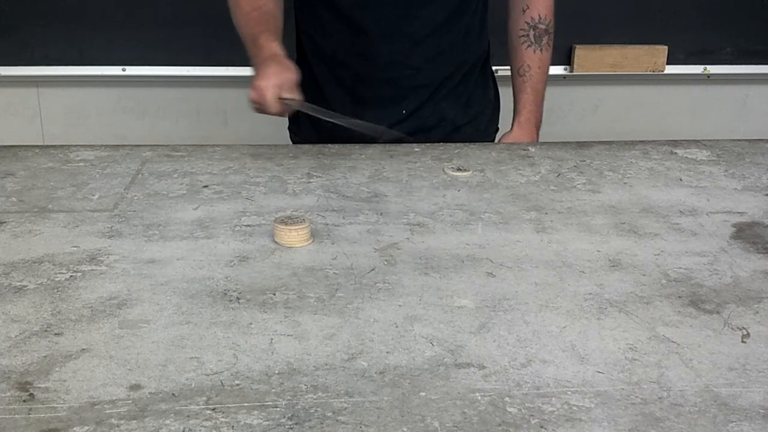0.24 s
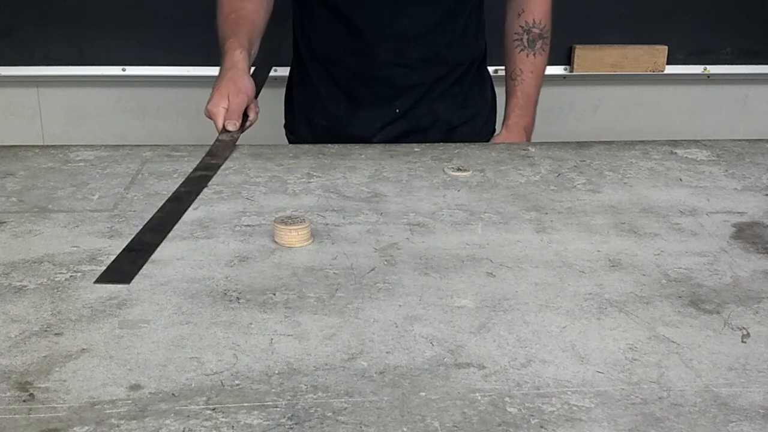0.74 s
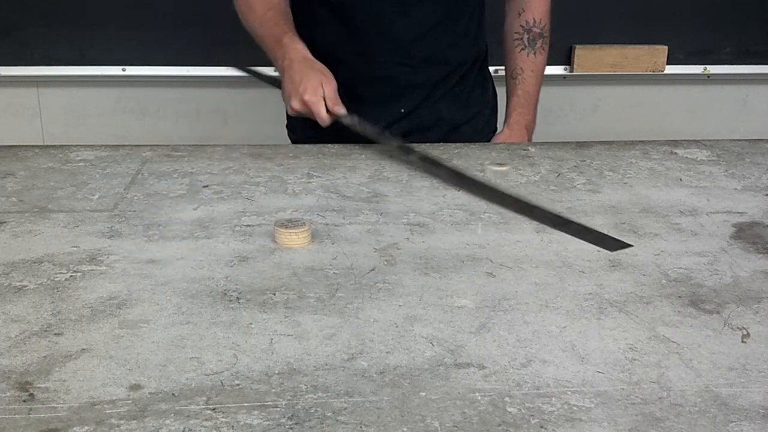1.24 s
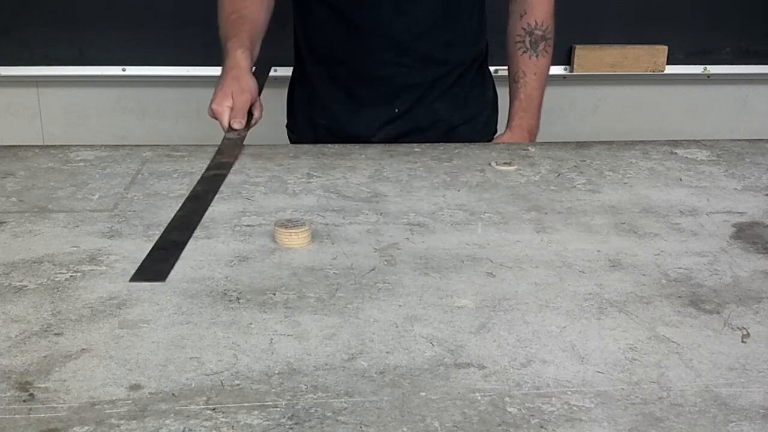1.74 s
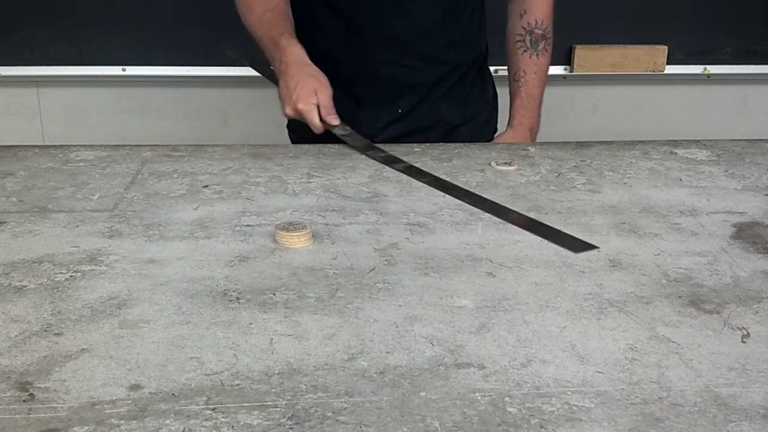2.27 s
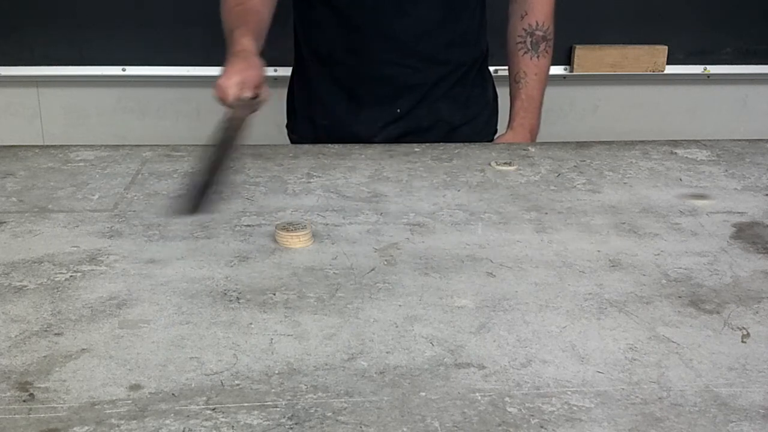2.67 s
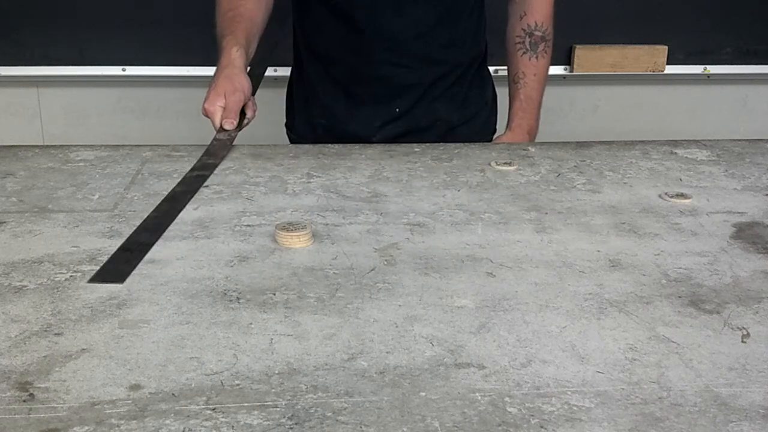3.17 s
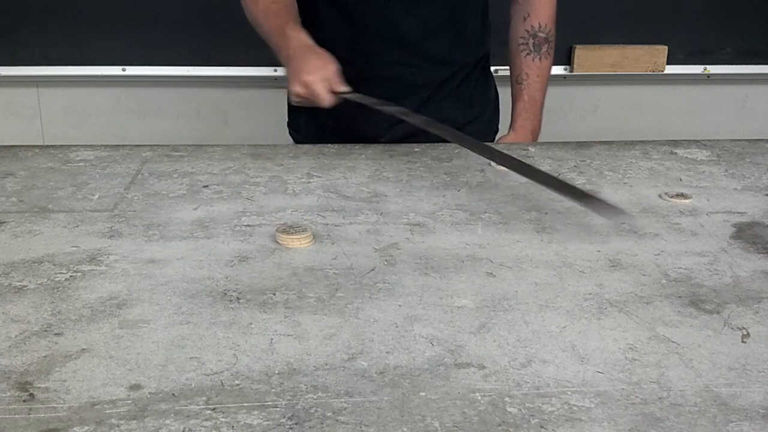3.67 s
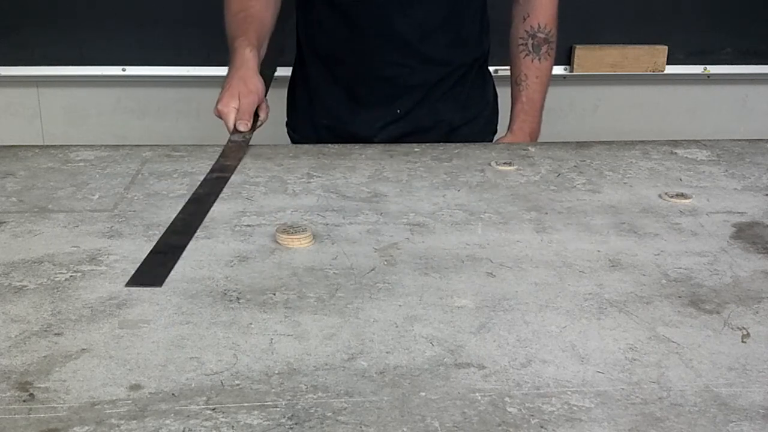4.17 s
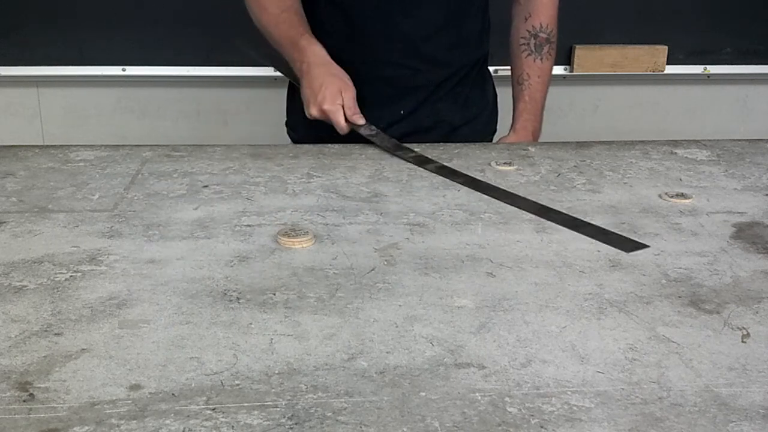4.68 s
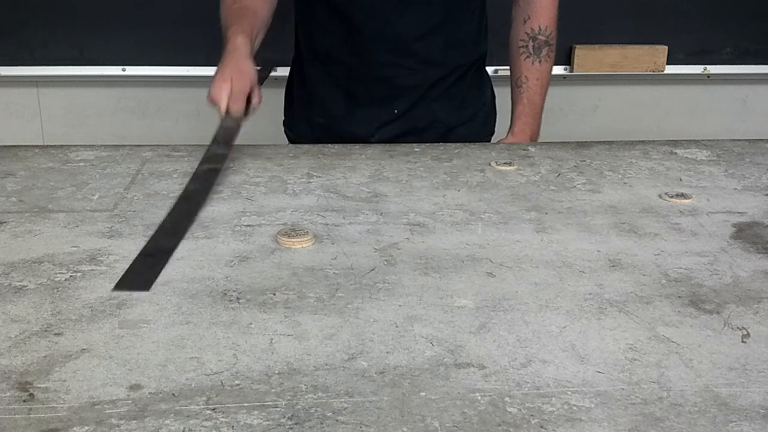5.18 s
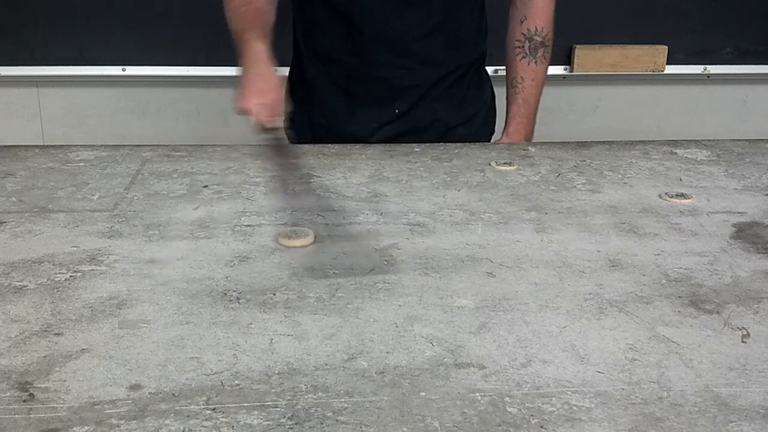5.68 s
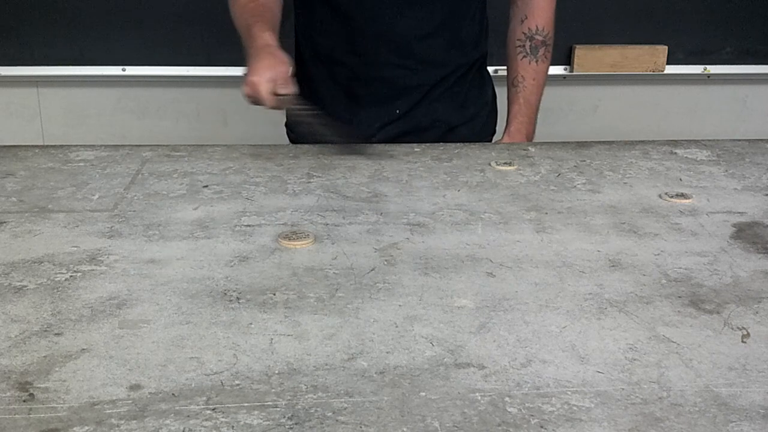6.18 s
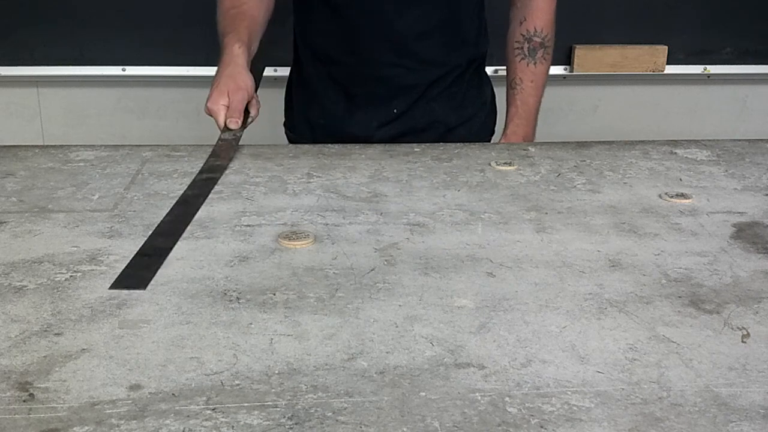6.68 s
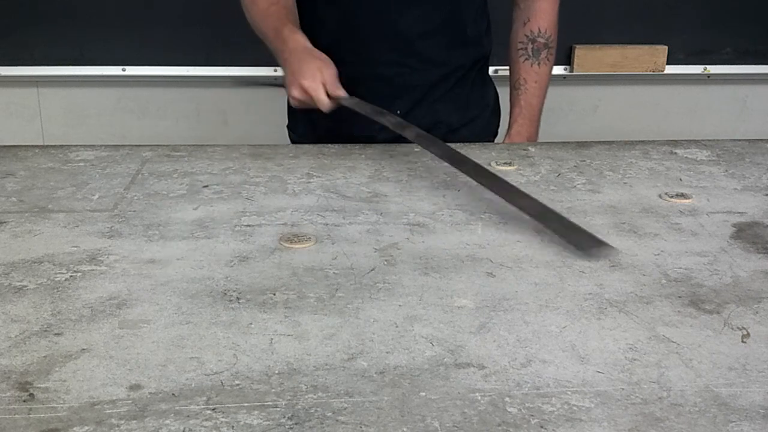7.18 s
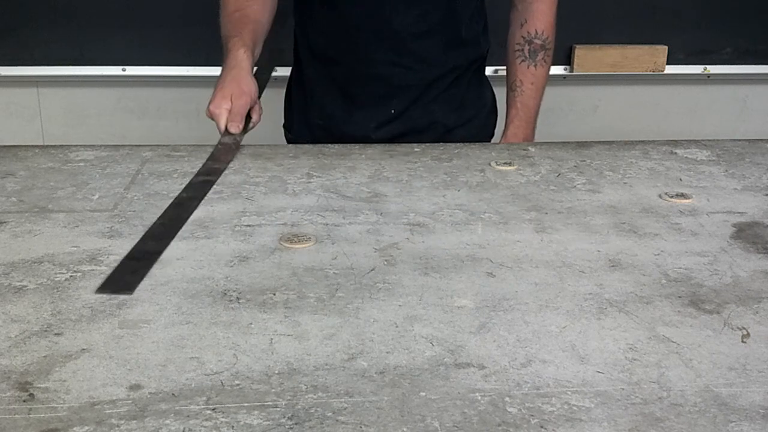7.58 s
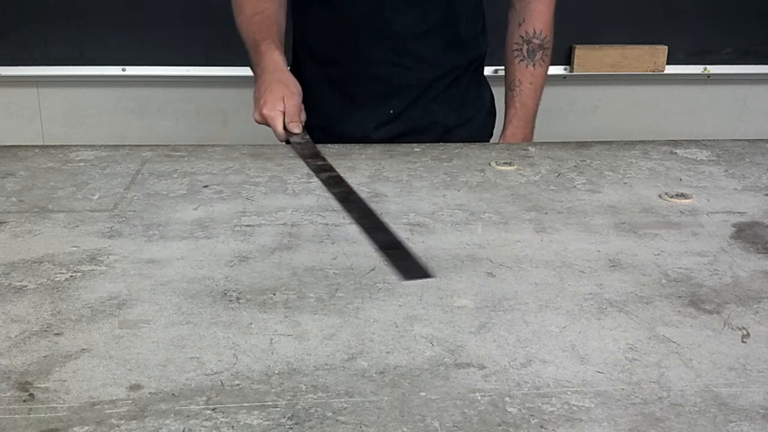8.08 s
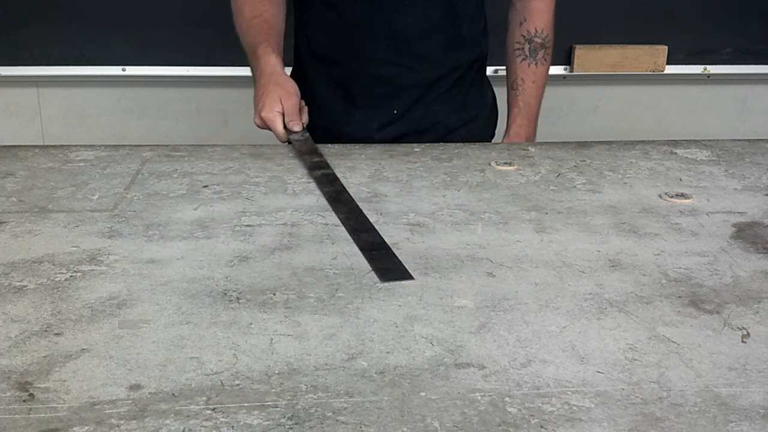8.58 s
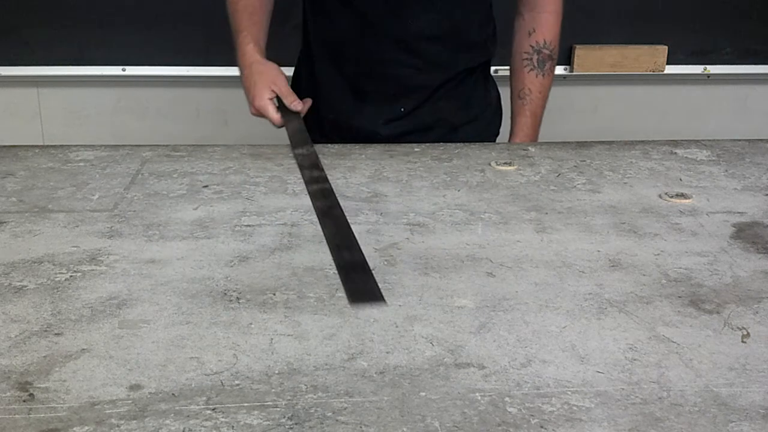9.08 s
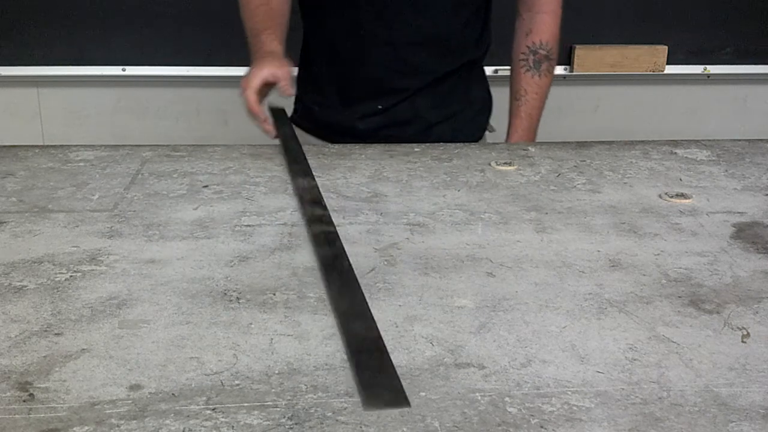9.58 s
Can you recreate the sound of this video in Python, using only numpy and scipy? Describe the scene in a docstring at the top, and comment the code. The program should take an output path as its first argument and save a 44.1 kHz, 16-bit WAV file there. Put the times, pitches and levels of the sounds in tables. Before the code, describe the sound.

Bright metallic double slaps, short gritty swishes and hard wooden cracks repeat about once a second in a small hard room, ending with a dragging scrape.

```python
"""A tabletop in a small hard room: a long steel ruler is slapped down and swept, shooting wooden discs from a stack.
Each swing is a double clack, a dry scrape with a tick at the stack, and a sharp knock of the disc beyond.
At the end the ruler is dragged forward, lowered and let go.
Blows are shaped impulses with noise chatter and dying modes; sliding is grainy noise under speed and pressure curves;
the room is sparse reflections that die band by band."""
import sys
import numpy as np
from scipy import signal
from scipy.fft import rfft, irfft
from scipy.io import wavfile
from scipy.ndimage import uniform_filter1d

SR = 44100
rng = np.random.default_rng(int(sys.argv[2]) if len(sys.argv) > 2 else 0)


def transcribe(u):
    """Save the signal u as a 16-bit wav file named by the first command-line argument.

    u: samples, shape (n,) or (channels, n), limited to [-1, 1]; the rate is SR.
    q: integer samples, one column per channel.
    """
    v = np.clip(np.atleast_2d(u).T, -1, 1)
    q = np.round(v * 32767).astype(np.int16)
    wavfile.write(sys.argv[1], SR, q)


N = 433503
TIME = np.arange(N) / SR
AGE = TIME[:SR // 2]
BLOW = np.sqrt(SR / 1e3) * (AGE == 0)  # impulse with the energy of 1 ms at unit level

# single slaps of blade on table: start_s, clack_db, thud_db, tilt_db_per_octave
SLAPS = [(.545, -17, -32, 0), (.661, -20, -31, 2), (1.783, -22.5, -31, 2), (1.869, -36, -41, 0),
         (1.886, -38, -40, 2), (1.955, -38, -41, 5), (8.895, -32, -46, 4), (9.131, -24.5, -39, 6),
         (9.164, -32, -43, -4), (9.303, -29, -54, -4), (9.679, -37, -36, -8), (9.694, -17.5, -35, -2)]
# blade laid down for a swing (touch, hop, flat fall, bounce):
# touch_s, clack_db, thud_db, fall_s, fall_clack_db, fall_thud_db, fall_tilt_db_per_octave,
# bounce_after_fall_s, bounce_db
LANDINGS = [(.438, -24.5, -23.5, .524, -24, -33, -3.5, .008, -22),
            (1.611, -28, -31.5, 1.717, -22, -28, 1.5, .014, -31),
            (2.876, -27.5, -40, 2.960, -24, -36, 6, .008, -23),
            (4.058, -24, -39, 4.121, -19.5, -38, 5, .014, -27),
            (5.246, -21.5, -38, 5.317, -17.5, -43, 4, .017, -29),
            (6.436, -25.5, -44, 6.507, -18.5, -36, -1, .010, -35),
            (7.558, -25, -36.5, 7.635, -20, -41, 1.5, .011, -28)]
# disc hits something beyond the stack: knock_s, knock_db, edge_tick_db, first_bounce_s, bounce_db
KNOCKS = [(.662, -15.5, -22, .831, -57.5), (1.317, -27, -27, 1.42, -62), (2.45, -15, -41, 2.537, -38.5),
          (3.575, -27, -24.5, 3.68, -54.5), (4.823, -18, -35, 4.936, -35.5), (6.012, -21, -41, 6.11, -53),
          (7.194, -17, -37.5, 7.367, -45), (8.376, -18.5, -40, 8.48, -57)]
# stray light contacts of blade, discs and table: start_s, level_db
STRAY_TICKS = [(0.103, -32), (.146, -23), (.831, -43), (5.08, -48), (5.125, -47), (5.918, -42),
               (8.292, -31), (9.693, -35)]
# blade flexing in the air: start_s, level_db, rise_s
SHIVERS = [(0.145, -33, 0.00046), (4.302, -35.5, 0.0086), (4.726, -38, 0.01), (5.11, -49, .02)]
# blade sweeping the table: up_to_speed_s, length_s, scrape_db, stack_tick_db (None: no disc)
SWEEPS = [(-.05, 0.37, -42, None), (1.065, 0.37, -41, -35.5), (2.199, 0.38, -38.5, -23.5),
          (3.38, 0.37, -38.5, -31.5), (4.586, 0.31, -37.5, -32), (5.759, 0.34, -43.5, -33),
          (6.915, 0.36, -39.5, -26), (8.041, .33, -40.5, -30.5), (8.845, 0.16, -41.5, None),
          (9.5, 0.3, -36, None)]
# pressure of the blade dragged forward: time_s, level_db
DRAG_PRESSURE = [(8.75, -56), (8.885, -62), (8.912, -39.5), (9.115, -49), (9.16, -36), (9.212, -48),
                 (9.4, -43.5), (9.6, -46.5), (9.68, -41)]
# resonance of the air wedge under the sinking blade: time_s, resonance_hz, level_db
AIR_WEDGE = [(9.429, 2400, -45), (9.479, 2170, -36.5), (9.52, 1880, -46), (9.561, 1320, -40),
             (9.62, 1000, -51), (9.691, 660, -41.5), (9.71, 656, -56)]
# modes of the table with the blade on it: mode_hz, level_db, t60_s
TABLE_MODES = [(123.5, -16.5, 0.25), (162.2, -6, .5), (208, -0.5, 0.23), (256.6, 3, 0.21), (362, -23, 0.22),
               (517.6, 3.5, 0.3), (567, 7.5, 0.091), (652, 2, 0.078), (710, -5.5, 0.1886), (837, -8, 0.54),
               (1023, 3, 0.19), (1200, -5.5, 0.28), (1305, -10.5, .2), (1593, -38.5, 0.24),
               (2080, -6.5, 0.18)]
# modes of what the discs hit: mode_hz, level_db, t60_s
STOP_MODES = [(435.5, -41, 0.21), (1117, -29.5, 0.18), (1430, -29.5, 0.046)]
# modes of the steel blade: mode_hz, level_db, t60_s
STEEL_MODES = [(2160, -52, 0.14), (3720, -66, .08), (4450, -70, 0.14), (6400, -56, 0.38), (9140, -50, 0.22),
               (12600, -58.5, .2), (12600, -59, 0.093), (12560, -59.5, 0.071)]
# spectrum of blade clack: freq_hz, density_db_per_hz
CLACK_SPECTRUM = [(100, -14.5), (700, -18), (1600, -14), (2200, -10.5), (3900, 2), (4800, -3),
                  (6000, -11.5), (7500, -15.5), (10000, -17), (12500, -10.5), (15500, -11.5)]
# spectrum of table thud: freq_hz, density_db_per_hz
THUD_SPECTRUM = [(30, -29.5), (75, -13.5), (118, -9.5), (240, -3), (680, -1.5), (1400, -2.5), (2500, -13.5),
                 (6000, -43.5)]
# spectrum of wooden crack: freq_hz, density_db_per_hz
WOOD_SPECTRUM = [(100, -55.5), (700, -29), (1500, -18), (2400, -8), (3100, 2), (3900, 3.5), (4500, -9),
                 (5500, -5), (6500, -17.5), (8300, -31.5), (10000, -33.5), (12000, -35), (15500, -30.5)]
# spectrum of the knock's diffuse ring: freq_hz, density_db_per_hz
BOARD_SPECTRUM = [(150, -9), (700, -8.5), (1500, -1.5), (2800, -0.5), (4000, 2), (5600, -0.5), (6600, -5),
                  (8000, -19), (10000, -16), (15500, -16)]
# spectrum of scrape and ticks: freq_hz, density_db_per_hz
SCRAPE_SPECTRUM = [(60, -29), (200, -18.5), (700, -10.5), (1700, -9), (2700, -11.5), (3850, 2), (4600, -4),
                   (5600, -7), (7700, -11.5), (10000, -9), (13000, -5.5), (15500, -9)]
# spectrum of the dragged blade's rub: freq_hz, density_db_per_hz
RUB_SPECTRUM = [(40, -49), (80, -27), (130, -3), (250, -3), (1500, 1.5), (4000, 0), (5500, -5.5),
                (8000, -11), (11000, -8), (13000, 0.5), (15500, -14)]
# spectrum of the free blade's ring: freq_hz, density_db_per_hz
SHIVER_SPECTRUM = [(200, -20.5), (2200, -20), (3500, -9.5), (4700, -7), (5250, 1.5), (5700, -37),
                   (6200, -14.5), (7300, -12.5), (9400, -18), (10400, -7), (13300, -24.5), (15000, -14)]
# spectrum of room noise: freq_hz, density_db_per_hz
HUSH_SPECTRUM = [(25, -12.5), (70, -11.5), (125, -1), (195, 7.5), (310, -3), (600, -12), (1500, -19),
                 (4000, -21), (7000, -28.5), (15000, -33)]
# room decay: freq_hz, t60_s
ROOM_DECAY = [(100, 0.94), (250, .55), (1000, 0.3), (4000, 0.3), (8000, 0.33), (16000, 0.23)]

EDGE_HZ = 15850  # upper band limit
TOUCH_TILT_DB_PER_OCTAVE = -5.5
# tip whips down just after the touch (levels re touch)
WHIP_S, WHIP_DB, WHIP_THUD_DB, WHIP_TILT_DB_PER_OCTAVE = .004, 1.5, -3, 2
# one rebound in the hop (both levels re touch clack)
REBOUND_S, REBOUND_DB, REBOUND_THUD_DB, REBOUND_TILT_DB_PER_OCTAVE = .022, -7, -15, 2
BOUNCE_THUD_DB, BOUNCE_TILT_DB_PER_OCTAVE = -2, -1.5  # bounce after the fall (thud re fall)
# last faint rattles: delay range after fall; clack re bounce, thud re fall
SETTLE_S, SETTLE_DB, SETTLE_THUD_DB = (.03, 0.083), -14, -19
BOUNCE_GAP_RATIO, BOUNCE_LOSS_DB = .78, -9.5  # per disc bounce
RIM_S, RIM_DB = (0.0031, .012), -4.5  # disc's second edge: delay range, level re first
RUN_UP_S = 0.094  # sweep start to up_to_speed_s
SWEEP_SKEW, SWEEP_SHARPNESS = 0.61, 1.77  # speed arch, rising faster than it falls
SLAB_WIDE_DB, SLAB_WIDE_HZ = -10, 900  # low ring of the slab, from the sides


def amp(db):
    """Decibels to gain."""
    return 10 ** (np.asarray(db) / 20)


def evened(x):
    """Scale to unit RMS."""
    return x / np.sqrt(np.mean(x ** 2) + 1e-20)


def read(points, hz):
    """Interpolate a table over log frequency."""
    f, value = np.transpose(points)
    return np.interp(np.log(hz + 1), np.log(f + 1), value)


def add(mix, s, sound):
    """Mix a sound in at s seconds."""
    part = mix[round(s * SR):][:len(sound)]
    part += sound[:len(part)]


def noise():
    """White noise as long as one blow."""
    return rng.standard_normal(len(AGE))


def lowpass(x, order, cutoff_hz):
    """Butterworth low-pass."""
    return signal.sosfilt(signal.butter(order, cutoff_hz, fs=SR, output="sos"), x)


def pulse(spectrum, spread_s=0, tilt_db=0, size=4096):
    """Causal click of unit energy; bending waves spread it, treble arriving first."""
    hz = abs(np.fft.fftfreq(size, 1 / SR))
    log_gain = np.log(amp(read(spectrum, hz) + tilt_db * np.log2(1 + hz / 1e3)))
    minimum_phase = np.exp(np.conj(signal.hilbert(log_gain)))[:size // 2 + 1]
    hz = hz[:size // 2 + 1]
    turns = spread_s * (2 * np.sqrt(1e3 * hz) - hz / 4)  # delay falls with 1 / sqrt(Hz)
    click = irfft(minimum_phase * np.exp(-2j * np.pi * turns))[:size // 2]
    return click / np.linalg.norm(click)


def colour(x, click):
    """Convolve, keeping the length."""
    return signal.oaconvolve(x, click)[:len(x)]


def grains(count, spread_db):
    """Tiny contacts of very uneven size."""
    size_db = spread_db * np.minimum(rng.exponential(1, count), 6)
    return evened(rng.standard_normal(count) * amp(size_db))


def ring(modes, t, scatter_db, detune=0):
    """Dying modes, excited and loaded a little differently on each call."""
    out = 0
    for hz, db, t60 in modes:
        decay = amp(db + scatter_db * rng.standard_normal() - 60 * t / t60)
        mode_hz = hz * (1 + detune * rng.standard_normal())
        out = out + decay * np.sin(2 * np.pi * (mode_hz * t + rng.random()))
    return out


def resonate(x, hz, width):
    """Steep two-pole resonance that can follow a frequency curve."""
    turn = np.exp(2j * np.pi * np.cumsum(hz * np.ones(len(x))) / SR)
    r = np.exp(-np.pi * width / SR)
    return evened((turn * signal.lfilter([1], np.poly([r, r]), x / turn)).real)


def stroke(rows):
    """Gain over the scene from (time_s, level_db), silent outside the rows."""
    s, db = np.transpose(rows)
    return amp(np.interp(TIME, s, db, left=-200, right=-200))


def flutter(depth_db, rate_hz):
    """Uneven contact pressure as a gain: low-passed noise in dB."""
    return amp(depth_db * evened(lowpass(rng.standard_normal(N), 2, rate_hz)))


def patchy(x, depth_db, size=512):
    """The contact wanders along the blade, so each band swells and fades on its own."""
    z = signal.stft(x, SR, nperseg=size)[2]
    field = uniform_filter1d(rng.standard_normal(z.shape), size=6, axis=0)
    field = evened(uniform_filter1d(field, size=5, axis=1))
    return evened(signal.istft(z * amp(depth_db * field), SR, nperseg=size)[1][:len(x)])


def hush():
    """Low, steady room noise."""
    return amp(-68.5) * colour(rng.standard_normal(N), pulse(HUSH_SPECTRUM))


def room(x):
    """Sparse reflections that die band by band."""
    taps = rng.choice([-1., 1.], SR) * (rng.random(SR) < 3000 / SR) * (TIME[:SR] > .008)
    hz, t, z = signal.stft(taps, SR, nperseg=256)
    decay = amp(-60 * t / read(ROOM_DECAY, hz)[:, None])
    tail = signal.istft(z * decay, SR, nperseg=256)[1]
    return colour(x, tail / np.linalg.norm(tail))


def shivers():
    """The free blade rings in dense clusters of modes, as shaped noise."""
    out = np.zeros(N)
    for s, db, rise in SHIVERS:
        decay = amp(0 - 60 * AGE / 0.26) + amp(4.5 - 60 * AGE / 0.054)
        swell = (1 - np.exp(-AGE / rise)) * decay
        add(out, s, amp(db) * colour(noise() * swell, pulse(SHIVER_SPECTRUM)))
    return out


def light_contacts():
    """Blade at the stack, disc edges and strays: start_s, level_db."""
    at_stack = [(s, db) for s, _, _, db in SWEEPS if db is not None]
    edges = [(s, db) for s, _, db, _, _ in KNOCKS]
    return at_stack + edges + STRAY_TICKS


def ticks():
    """Short, bright ticks with a trace of chatter."""
    out, click = np.zeros(N), pulse(SCRAPE_SPECTRUM, spread_s=0.001417)
    for s, db in light_contacts():
        chatter = grains(len(AGE), 4.1) * amp(-5.0 - 60 * AGE / 0.013)
        add(out, s, amp(db) * colour(BLOW + chatter, click))
    return out


def sweep(start, length, db):
    """Speed of one sweep as a gain: the arm speeds up, then eases off."""
    part = np.clip((TIME - start) / length, 0, 1)
    return amp(db) * abs(np.sin(np.pi * part ** SWEEP_SKEW)) ** SWEEP_SHARPNESS


def air_wedge(air):
    """Air under the sinking blade resonates lower and lower, at a tone and its octave."""
    s, hz, db = np.transpose(AIR_WEDGE)
    hz = np.interp(TIME, s, hz) * flutter(depth_db=0.2, rate_hz=51)
    octave = amp(-2.5) * resonate(air, 2 * hz, width=620)
    return stroke(np.c_[s, db]) * (resonate(air, hz, width=380) + octave)


def sliding():
    """Steel rides over the table's grit: the faster, the louder and brighter."""
    speed = sum(sweep(s - RUN_UP_S, length, db) for s, length, db, _ in SWEEPS)
    pressure = stroke(DRAG_PRESSURE)
    snags = amp(-16.5) * evened(grains(N, 2.5) * (rng.random(N) < 220 / SR))
    grit = patchy(colour(grains(N, 1.8) + snags, pulse(SCRAPE_SPECTRUM)), depth_db=4.5)
    fizz = signal.sosfilt(signal.butter(1, 7000, "high", fs=SR, output="sos"), grit)
    fizz_gain = np.minimum(speed / amp(-40.0), 1.5) ** 1.73 - 1
    scrape = speed * (grit + fizz * fizz_gain)
    rub = patchy(colour(grains(N, 1.4) + snags, pulse(RUB_SPECTRUM)), depth_db=5.0)
    rub = amp(-0.25) * pressure * rub
    body = evened(colour(rng.standard_normal(N), ring(TABLE_MODES, AGE, scatter_db=2)))
    body = amp(-13.0) * pressure * body
    wedge = air_wedge(grains(N, 2.8) + snags)
    return (scrape + rub + body + wedge) * flutter(depth_db=1.55, rate_hz=98)


def disc_contacts(count=3):
    """Each disc's knock and its ever quicker bounces: start_s, level_db."""
    rows = []
    for knock, db, _, s, bounce_db in KNOCKS:
        rows.append((knock, db))
        gap = s - knock
        for k in range(count):
            level = bounce_db + k * BOUNCE_LOSS_DB
            rows += [(s, level), (s + rng.uniform(*RIM_S), level + RIM_DB)]
            gap = gap * BOUNCE_GAP_RATIO
            s = s + gap
    return rows


def knocks():
    """A disc's short wooden crack, doubled by the tabletop; after a hard one it skitters to rest."""
    out, wood = np.zeros(N), pulse(WOOD_SPECTRUM, spread_s=.003)
    diffuse = pulse(BOARD_SPECTRUM)
    dull = pulse(BOARD_SPECTRUM, tilt_db=-4.0)  # light taps lack treble
    for s, db in disc_contacts():
        crack = amp(db) * colour(BLOW + noise() * amp(-16.0 - 60 * AGE / .016), wood)
        decay = amp(-25 - 60 * AGE / 0.067) + amp(-30 - 60 * AGE / 0.46)
        board = amp(db) * colour(noise() * decay, diffuse)
        stop = amp(db - 1.5) * ring(STOP_MODES, AGE, scatter_db=3.5, detune=0.011)
        add(out, s, amp(-5) * crack)
        add(out, s + 0.001128, -crack + board + stop)  # second crack inverted
        if db > -26:
            for delay, weight in rng.random(size=(16, 2)):
                tap = colour(noise() * amp(-60 * AGE / 0.055), dull)
                add(out, s + 0.1 + 0.57 * delay, amp(-69.0 + 4.6 * weight ** 2) * tap)
    return out


def blade_contacts():
    """Every slap of blade on table: start_s, clack_db, thud_db, tilt_db_per_octave."""
    rows = list(SLAPS)
    for touch, db, thud_db, fall, fall_db, fall_thud_db, tilt_db, bounce, bounce_db in LANDINGS:
        rows += [(touch, db, thud_db, TOUCH_TILT_DB_PER_OCTAVE),
                 (touch + WHIP_S, db + WHIP_DB, thud_db + WHIP_THUD_DB, WHIP_TILT_DB_PER_OCTAVE),
                 (touch + REBOUND_S, db + REBOUND_DB, db + REBOUND_THUD_DB, REBOUND_TILT_DB_PER_OCTAVE),
                 (fall, fall_db, fall_thud_db, tilt_db),
                 (fall + bounce, bounce_db, fall_thud_db + BOUNCE_THUD_DB, BOUNCE_TILT_DB_PER_OCTAVE)]
        for wait in rng.uniform(*SETTLE_S, size=2):
            rows.append((fall + wait, bounce_db + SETTLE_DB, fall_thud_db + SETTLE_THUD_DB,
                         BOUNCE_TILT_DB_PER_OCTAVE))
    return rows


def slaps():
    """The blade strikes, chatters on the surface, sings briefly and shakes the table."""
    out, thud_click = np.zeros(N), pulse(THUD_SPECTRUM)
    for s, db, thud_db, tilt_db in blade_contacts():
        buzz = amp(-2.0 - 60 * AGE / 0.021) + amp(-22.5 - 60 * AGE / 0.22)
        chatter = grains(len(AGE), 1.6) * buzz * (1 - np.exp(-AGE / 0.00024))
        clack_click = pulse(CLACK_SPECTRUM, spread_s=0.001602, tilt_db=tilt_db)
        clack = colour(amp(-3.0) * BLOW + chatter, clack_click)
        sing = resonate(noise(), hz=6400, width=370) * amp(-28.5 - 60 * AGE / 0.19)
        thud_decay = amp(-1 - 60 * AGE / 0.055) + amp(-16 - 60 * AGE / 0.18)
        thud = colour(noise() * thud_decay, thud_click)
        body = amp(-22) * ring(TABLE_MODES, AGE, scatter_db=4, detune=.004)  # whole slab
        onset = 1 - np.exp(-AGE / 0.0022)
        add(out, s, amp(db) * (clack + sing) + amp(thud_db) * (thud + body) * onset)
    return out


def stereo(front, side):
    """Wide microphone pair: delayed between channels, but nearly in phase in the bass."""
    hz = np.fft.rfftfreq(N, 1 / SR)
    lag = 2 * np.pi * hz * 16 / SR  # 16 samples, as phase
    front, side = rfft(front), rfft(side)
    left = front + side * np.exp(-1j * lag)
    right = front * np.exp(1j * np.minimum(np.pi - lag, .4)) - side
    return irfft(np.array([left, right]), N)


def scene():
    """Blade left of centre, discs to the right, room from all sides."""
    blade, disc, slide = slaps() + ticks() + shivers(), knocks(), sliding()
    blade = blade + colour(blade + slide, ring(STEEL_MODES, AGE, scatter_db=-2.5))
    send = amp(-14.0) * blade + amp(-25.5) * disc + amp(-11.0) * slide
    leftward = 0.085 * blade - 0.17 * disc + 0.072 * slide
    gradient = (np.roll(leftward, -6) - np.roll(leftward, 6)) / 2
    front = blade + disc + slide + room(send) + hush()
    slab = lowpass(room(blade + slide), 2, SLAB_WIDE_HZ)
    side = gradient + amp(SLAB_WIDE_DB) * slab + amp(-2.5) * room(send) + amp(2.5) * hush()
    return stereo(front, side)


def record(dry):
    """Microphones: steep bass cut with a little leaking under it, and a band limit."""
    bass_cut = signal.butter(8, 114, "high", fs=SR, output="sos")
    cut = signal.sosfilt(bass_cut, dry) + amp(-20.5) * dry
    band_limit = signal.firwin(255, EDGE_HZ, window=("kaiser", 8), fs=SR)
    return signal.oaconvolve(cut, band_limit[None], "same")


dry = scene()
out = record(dry)
transcribe(out)
```